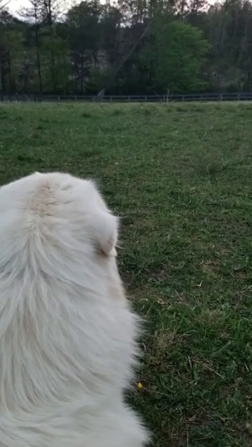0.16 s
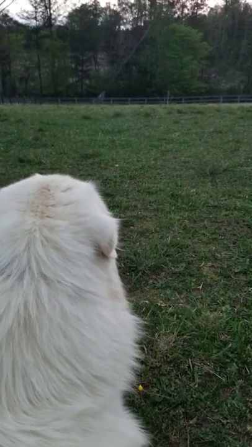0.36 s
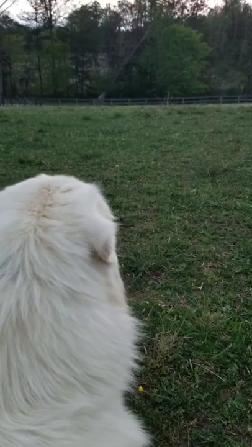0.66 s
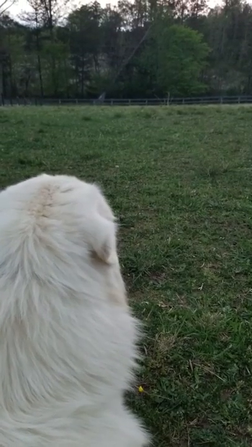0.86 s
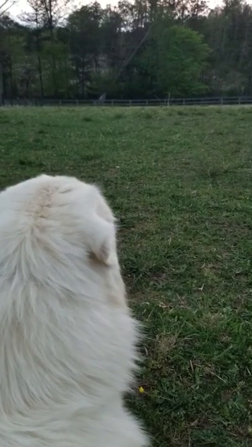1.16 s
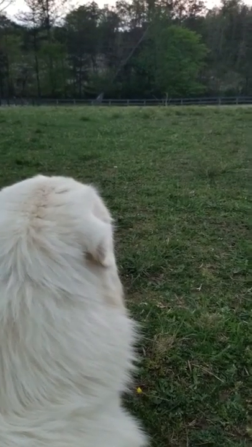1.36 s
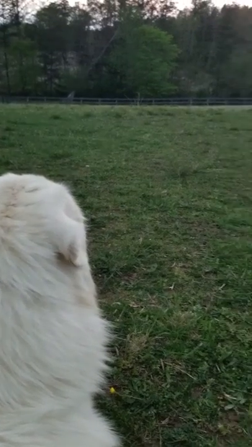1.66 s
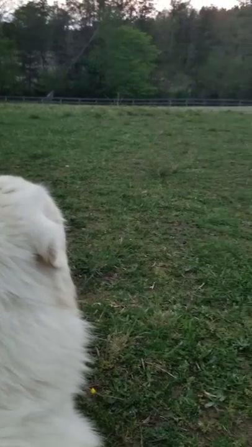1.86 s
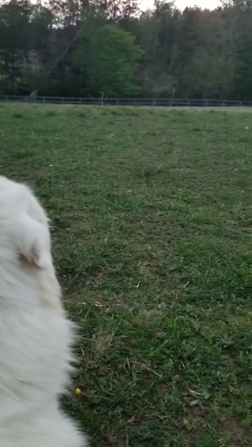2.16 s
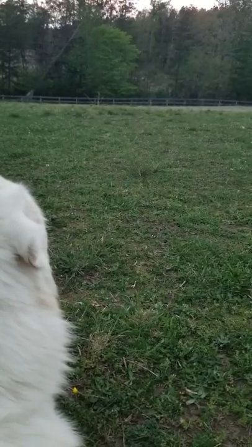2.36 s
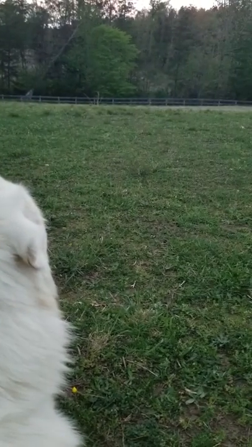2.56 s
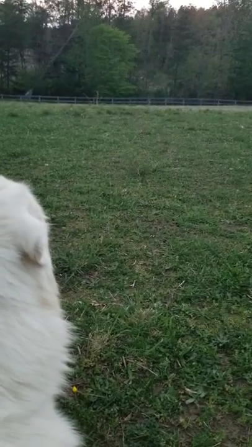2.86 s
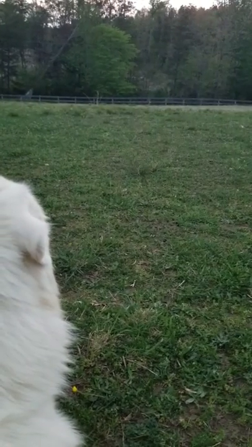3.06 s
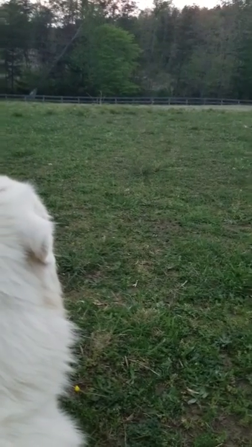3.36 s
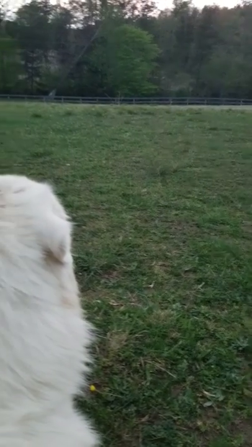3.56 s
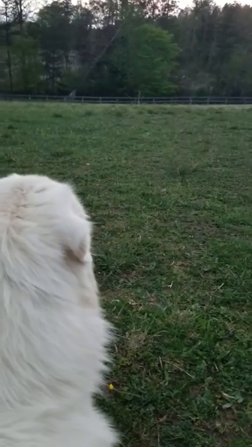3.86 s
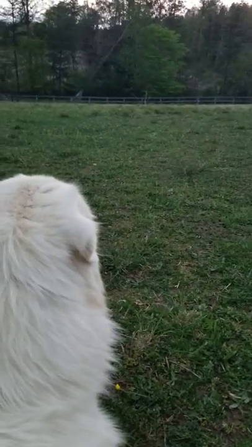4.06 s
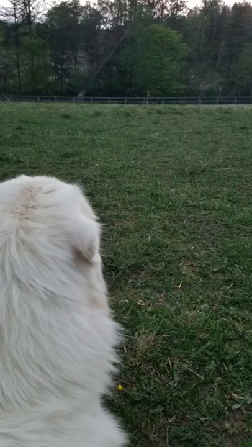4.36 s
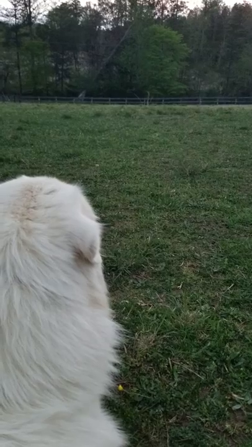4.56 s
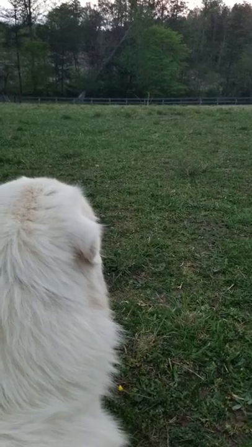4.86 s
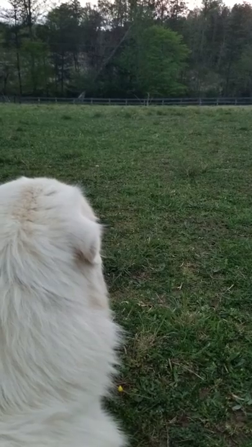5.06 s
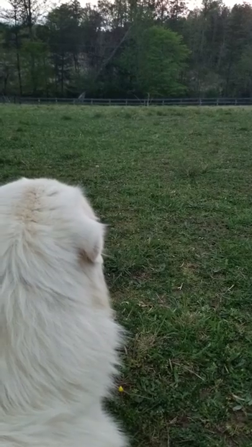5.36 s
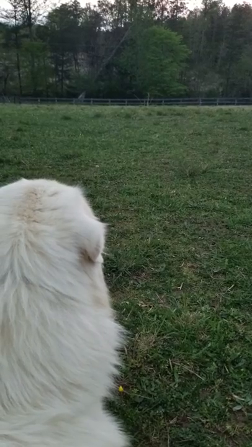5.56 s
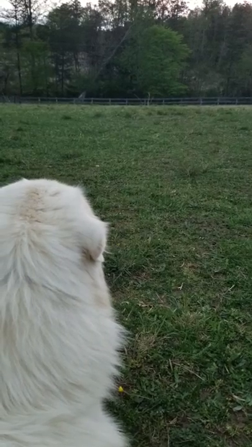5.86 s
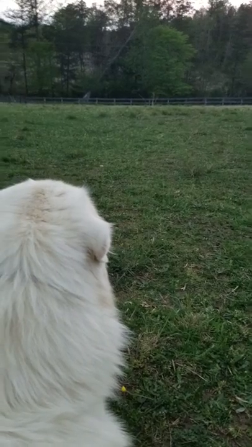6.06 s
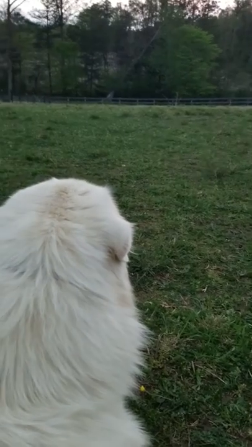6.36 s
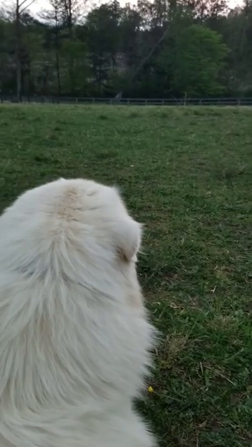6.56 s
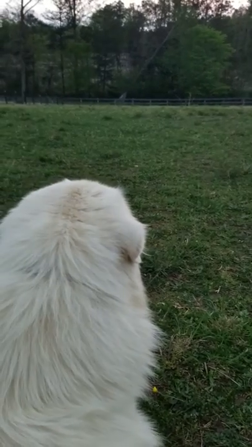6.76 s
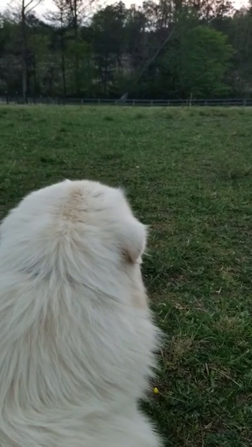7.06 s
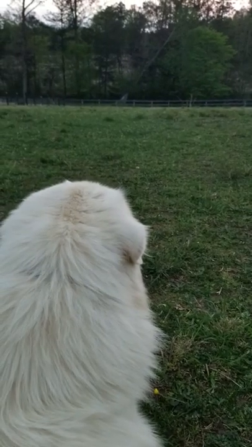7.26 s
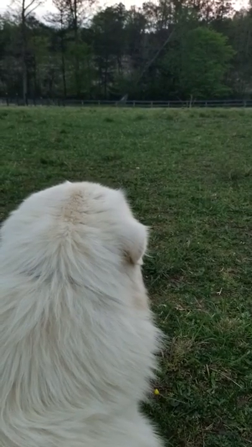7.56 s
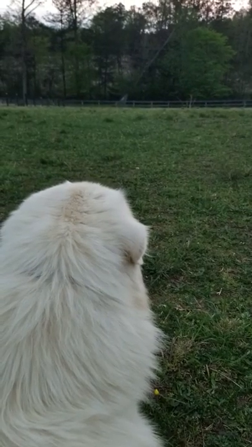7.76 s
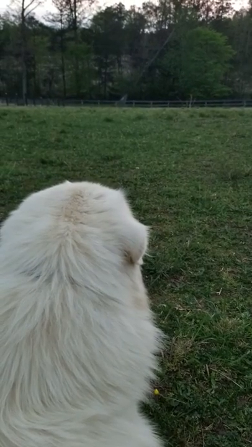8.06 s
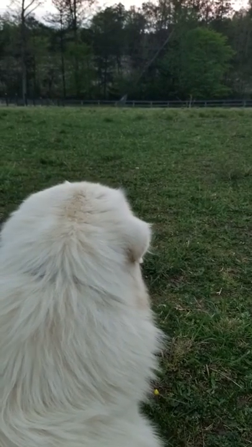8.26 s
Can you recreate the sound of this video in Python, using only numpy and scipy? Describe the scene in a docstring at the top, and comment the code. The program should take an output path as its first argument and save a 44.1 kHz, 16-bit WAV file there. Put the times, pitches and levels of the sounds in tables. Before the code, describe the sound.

Quiet pasture with distant frogs, birds and small crackles, then a big dog close by grumbles and gives three deep, hoarse-ending barks echoing faintly.

```python
"""In a pasture, a big dog beside the microphone grumbles, then gives three deep barks; a low growl joins the last two.
Its voice is made of pulses and air noise, filtered by throat, mouth and muzzle; the tree line answers faintly
as fading noise echoes. Snaps are short noise bursts. Songbirds whistle and frogs peep far off as sliding tones.
Behind them, filtered noise makes a soft distant rumble, a frog chorus and a thin insect trill."""
import sys
import numpy as np
from scipy import signal
from scipy.fft import rfft, irfft, next_fast_len
from scipy.io import wavfile
from scipy.ndimage import uniform_filter1d, map_coordinates

SR = 44100
rng = np.random.default_rng(int(sys.argv[2]) if len(sys.argv) > 2 else 0)


def log_audio(samples):
    """Write samples as a 16-bit WAV file to the path given in sys.argv[1]."""
    # one column per channel
    frames = np.atleast_2d(samples).T
    # limit to full scale, then quantise
    limited = np.clip(frames, -1, 1)
    pcm = np.round(limited * 32767).astype(np.int16)
    wavfile.write(sys.argv[1], SR, pcm)


N = 371322  # length in samples

# When the dog growls between the last two barks: start in seconds, end in seconds.
GROWL_SPAN = (6.41, 6.70)
LEAD_S = .026  # time over which barks and growl fade in and out, in seconds


def dog():
    """A closed-mouth grumble, then the barks, the last two joined by a growl."""
    # When it grumbles before barking: start in seconds, end in seconds.
    grumble_span = (5.433, 5.535)
    # The grumble: beats a second, relative peak level in dB.
    grumble_settings = (69, -34.5)
    # The barks. Each row: time of the top in seconds, seconds from start to top, top pitch in Hz, rest pitch in Hz,
    # pitch rise in seconds, pitch fall in seconds, seconds from register break to top, jaw lag in seconds,
    # roughness at the start (0-1), roughness when clearest (0-1), seconds from top to full hoarseness,
    # then the relative levels of throat, mouth, muzzle and hiss in dB.
    barks = [(5.856, .102, 431.8, 71.83, .1, .066, .11, .002, 0.47, .38, 0.026, -10.5, -26, -27.5, -54),
             (6.307, .089, 438.4, 109.8, .082, 0.065, .052, 0.042, .75, .2, 0.038, -8, -24, -29, -53),
             (6.766, .096, 440.5, 82, .076, .078, .11, 0.0019, 0.28, 0.1, 0.029, -9, -25.5, -26.5, -51.5)]
    # The growl: pitch in Hz away from its ends, roughness (0-1),
    # then the relative levels of throat, mouth, muzzle and hiss in dB.
    growl_settings = (109.5, 0.23, -39.5, -69, -58, -75.5)
    voice = grumble(*grumble_span, *grumble_settings)
    for top_s, lead_s, *row in barks:
        add(voice, top_s - lead_s, bark(lead_s, *row))
    add(voice, GROWL_SPAN[0], growl(*growl_settings))
    return voice


def bark(lead_s, top_hz, rest_hz, rise_s, fall_s, low_s, jaw_lag_s, start_rough, clear_rough, collapse_s,
         throat_db, mouth_db, muzzle_db, hiss_db):
    """One push of effort arches the pitch; the voice clears going up and turns hoarse falling; the jaw opens and shuts."""
    # How each part of the airway swells and fades: attack in seconds and release in seconds (each over 10 dB),
    # then flatness of the top (a plain number).
    throat_swell = (0.067, 0.069, 1.42)
    mouth_swell = (.068, 0.12, 4.3)
    muzzle_swell = (0.062, 0.084, 2.22)
    hiss_swell = (.056, 0.087, 1.6)
    trail_s = .172  # the voice stops this long after its top
    t = np.arange(-lead_s, trail_s, 1 / SR)
    rise_curve, fall_curve = 1.6, 1.8  # roundness of the pitch arch
    rising = np.abs(t / rise_s) ** rise_curve
    falling = np.abs(t / fall_s) ** fall_curve
    effort = np.exp(-np.where(t < 0, rising, falling))

    # until the voice breaks upward it is lower, with extra boom
    low_pitch_share, low_boom_db = .74, 6.5
    low = uniform_filter1d(1.0 * (t < -low_s), size=400)
    pitch = (rest_hz + (top_hz - rest_hz) * effort) * low_pitch_share ** low

    clear_s, hoarse_rough = .015, .98  # clearest this long before the top; roughness once hoarse
    rough = np.interp(t, [-lead_s, -clear_s, collapse_s], [start_rough, clear_rough, hoarse_rough])

    # the mouth rings as the second harmonic sweeps through
    mouth_hz, mouth_width_hz, mouth_ring_db = 701, 88, 8
    ring_db = mouth_ring_db * np.exp(-((2 * pitch - mouth_hz) / mouth_width_hz) ** 2)
    # the throat weakens at pitches where no harmonic meets its resonance
    dip_hz, dip_width_hz, throat_dip_db = 257, 61, 4.5
    dip_db = throat_dip_db * np.exp(-((pitch - dip_hz) / dip_width_hz) ** 2)

    gate = np.clip(np.minimum(t + lead_s, trail_s - t) / LEAD_S, 0, 1)
    return gate * airway(pitch, rough,
                         throat_db + swell(t, throat_swell) + low_boom_db * low - dip_db,
                         mouth_db + swell(t, mouth_swell) + ring_db,
                         muzzle_db + swell(t - jaw_lag_s / 2, muzzle_swell),
                         hiss_db + swell(t - jaw_lag_s, hiss_swell))


def swell(t, shape):
    """Level in dB that rises to 0 at t = 0 and falls away again."""
    attack_s, release_s, flatness = shape
    return -10 * np.abs(t / np.where(t < 0, attack_s, release_s)) ** flatness


def growl(hz, rough, *levels_db):
    """A low steady voice that sags out of one bark and tightens into the next: higher and stronger at both ends."""
    lift_hz, lift_db, lift_s = 28, 5, 0.038
    t = np.arange(0, GROWL_SPAN[1] - GROWL_SPAN[0], 1 / SR)
    edge_s = np.minimum(t, t[::-1])  # time to the nearer end
    lift = np.exp(-edge_s / lift_s)
    gate = np.clip(edge_s / LEAD_S, 0, 1)
    return gate * airway(hz + lift_hz * lift, rough, *[db + lift_db * lift for db in levels_db])


def grumble(start, end, rate, db):
    """Single beats of the folds thump in the chest, mouth closed."""
    # How the chest colours each beat. Each row: frequency in Hz, gain in dB.
    chest = [(30, -21), (90, 8.5), (180, -2.5), (300, -0.5), (450, -4.5), (650, -26), (1500, -48),
             (4000, -90)]
    top_s, fade_db_per_s = 0.045, 134.5  # loudest moment after the start, and the slope to either side
    beats = np.zeros(N)
    for t in np.arange(0, end - start, 1 / rate):
        beat_db = db - fade_db_per_s * abs(t - top_s) + rng.normal(0, 1.5)
        add(beats, start + t + rng.normal(0, .001), amp([beat_db + 38.5]))
    return coloured(beats, chest)


def airway(pitch, rough, throat_db, mouth_db, muzzle_db, hiss_db):
    """The folds sound through the throat, mouth and muzzle, and hiss past the teeth."""
    # Resonances of the airway, from the throat forward. Each row: frequency in Hz, relative level in dB.
    throat = [(50, -36), (110, -8), (220, -10), (330, 0.5), (430, 10.5), (490, -1), (560, -8), (700, -56),
              (1200, -102)]
    mouth = [(300, -99), (480, -2.5), (600, -0.5), (700, 2), (780, 2), (850, -10.5), (930, -19),
             (1500, -70)]
    muzzle = [(600, -59.5), (930, -11), (1050, -8.5), (1140, -5), (1290, 2.5), (1400, -3.5), (1510, -2),
              (1620, -12), (1730, -14.5), (1950, -15.5), (2200, -34.5), (3000, -48.5), (5000, -72.5)]
    hiss = [(1500, -44), (2400, 0), (3000, -8.5), (3650, -6.5), (4150, 4.5), (4550, -7), (5100, -9.5),
            (5700, -3), (6200, -16.5), (6600, -24), (7600, -11), (8300, -31.5), (15000, -35.5)]
    rough = np.clip(rough, 0, 1)
    pulses, flow, air = folds(pitch, rough)

    def resonance(source, shape, noise_share):
        """One part of the airway, rung by the folds and by air noise."""
        share = np.clip(noise_share, 0, 1)
        tone = np.sqrt(1 - share) * steady(coloured(source, shape))
        breath = np.sqrt(share) * steady(coloured(air, shape))
        return steady(tone + breath)

    voice = amp(throat_db) * resonance(flow, throat, .03 * rough ** 3)
    voice += amp(mouth_db) * resonance(pulses, mouth, .16 * rough ** 2)
    voice += amp(muzzle_db) * resonance(pulses, muzzle, .6 * rough ** 2)
    voice += amp(hiss_db + 1.0) * resonance(pulses, hiss, 0.58 + .65 * rough)
    t = np.arange(len(pitch)) / SR
    shimmer = amp(1.83 * rough * wobble(90, len(t)))  # unsteady level of a hoarse voice
    soft_ends = np.clip(np.minimum(t, t[::-1]) / 0.0043, 0, 1)
    return voice * shimmer * soft_ends


def folds(pitch, rough):
    """The source of the voice: pulses, the smooth flow under them, and air noise chopped once a cycle."""
    size = len(pitch)
    phase = 2 * np.pi * np.cumsum(pitch * (1 + 0.0365 * rough * wobble(330, size))) / SR
    k = np.arange(1, 31)[:, None]  # harmonic numbers
    pulses = unit(np.sum(np.cos(k * phase) / k ** 0.85, axis=0))
    pulses *= 1 + .36 * rough * wobble(260, size)
    # under strain a second, higher oscillator joins in: lines appear at its pitch minus and plus the harmonics
    second_hz, full_strain_hz = 1070, 440
    second = 2 * np.pi * np.cumsum(second_hz * (1 + 0.023 * rough * wobble(150, size))) / SR
    strain = (pitch / full_strain_hz) ** .55 * (0.066 + 1.3 * rough)
    pulses += strain * (np.cos(second) * (pulses + .5) + 0.27 * rough * np.cos(second - phase))
    # gently closing folds favour the fundamental
    flow = pulses + 2.6 * (1 - rough) ** 3 * np.cos(phase)
    # pressed, hoarse folds weaken it
    flow = flow - 0.33 * rough * np.cos(phase)
    air = unit(rng.standard_normal(size) * np.exp(1.4 * np.cos(phase)))
    return pulses, flow, air


def pasture(voice):
    """Quick reflections from the ground, scatter from the field, later answers from the tree line and woods behind."""
    # How fast the field's scatter dies. Each row: frequency in Hz, seconds to fade by 60 dB.
    field = [(100, .6), (400, 1.8), (1300, 2.88), (3000, 0.57), (8000, 0.46)]
    # How distance colours the echoes. Each row: frequency in Hz, gain in dB.
    field_colour = [(100, -14.5), (250, -7.5), (420, -4.5), (750, -1), (1300, 2), (1600, 2), (2500, 7),
                    (8000, -29)]
    far = coloured(voice, field_colour)
    near = coloured(voice, [(150, -32.0), (400, -27.5), (800, 3), (1500, 4.5), (4000, 12.5)])
    answer = amp(-9) * reverb(near, [(400, .05), (4000, .05)], rise_s=.002)
    answer += amp(-29.5) * reverb(far, field, rise_s=0.021)
    tree_line = reverb(far, [(200, 0.33), (2000, 0.39)], rise_s=.02)
    add(answer, .29, amp(-29.5) * tree_line)
    woods_behind = reverb(far, [(400, 4.9), (2000, 2.05)], rise_s=0.23)
    add(answer, .9, amp(-42.0) * woods_behind)
    return answer


def snaps():
    """Each snap is a noise burst: a brief crack, in most of them, with a short scattered tail."""
    # Dry snaps. Each row: start in seconds, relative level in dB, relative strength of the first crack (0-1).
    snap_rows = [(.009, -46.5, 0.4), (0.234, -51.5, 0.5), (0.906, -56.5, 0), (1.351, -53, 0.6),
                 (1.801, -45.5, 0.1), (3.06, -45.5, 1), (3.178, -48.5, 0), (3.561, -51, 0.3),
                 (3.573, -47, 0.84), (3.649, -63.5, 0.5), (4.51, -50, 0.8), (5.212, -45.5, 0.6),
                 (6.027, -46, 0.8)]
    # The colour of the snaps. Each row: frequency in Hz, gain in dB.
    snap_colour = [(200, -17), (390, 4.5), (520, -14.5), (900, -8.5), (1400, -13.5), (1850, -2.5),
                   (2050, -3.5), (2750, 0), (3100, -8.5), (3900, -2), (5100, -14), (7500, -20),
                   (8600, -45.5), (15000, -46.5)]
    track = np.zeros((2, N))
    t = np.arange(SR // 3) / SR
    for s, db, share in snap_rows:
        crack = 3.4 * share * amp(-60 * t / .012) * rng.standard_normal(len(t))
        tail_fade = amp(-60 * t / 0.18) + amp(-14 - 60 * t / .45)
        scatter = tail_fade * rng.standard_normal((2, len(t)))
        add(track, s, amp(db + 12.5) * (placed(crack, -0.097, [(1000, 5.1)]) + scatter))
    return placed(coloured(track, snap_colour), 0, [(1000, 1.4), (2500, 8.1), (4500, 1.5)])


def birds_and_frogs():
    """Chirps sound close by; a repeated song, slurred whistles and frog peeps sound farther off; all ring in the woods."""
    # Runs of arched chirps from a near bird. Each row: start in seconds, end in seconds, seconds between chirps,
    # chirp length in seconds, top pitch in Hz, dip at the top in dB (negative: a rise), relative level in dB,
    # fade in dB per chirp (negative: growing).
    twitters = [(0.049, .3, .107, .056, 2800, 9.5, -42, 2.5),
                (1.598, 1.76, 0.11, 0.046, 2580, 0.5, -52.5, -2),
                (2.671, 3.01, .095, .049, 2735, -3.5, -55.5, 4.5)]
    # Its sharp call notes. Each row: start in seconds, length in seconds, top pitch in Hz, relative level in dB.
    chips = [(.368, .033, 2700, -50), (1.314, .009, 2440, -46), (1.769, .0053, 2550, -35)]
    # A songbird's phrase: lead-in, high slur, drop and held note. Each row: seconds after the song's start,
    # length in seconds, start pitch in Hz and end pitch in Hz before the song's pitch factor, relative level in dB.
    phrase = [(0, .05, 2600, 2716, -7.5), (0.046, .04, 3600, 3204, 0.5), (.079, .037, 3030, 2272, 1.5),
              (.124, .115, 2638, 2336, -2)]
    # Each time it is sung. Each row: start in seconds, pitch factor (a plain number), relative level in dB.
    songs = [(4.944, 1, -53), (5.452, 0.99, -48.5), (7.505, 1.0, -53)]
    # Single slurred whistles. Each row: start in seconds, length in seconds, start pitch in Hz,
    # end pitch in Hz, relative level in dB.
    whistles = [(.66, 0.053, 2060, 1930, -68.5), (2.579, 0.06, 2490, 2210, -62.5),
                (5.947, .064, 3350, 2780, -50), (6.049, .068, 3790, 3480, -49),
                (6.137, .066, 2160, 2570, -52.5), (6.2, 0.039, 2524, 2230, -49.5),
                (8.032, 0.14, 3168, 3220, -49), (8.114, .19, 2850, 2673, -53),
                (8.188, .034, 2770, 2490, -55)]
    # Bouts of rising peeps from the nearest frogs. Each row: start in seconds, end in seconds,
    # seconds between peeps, start pitch in Hz, relative level in dB.
    frogs = [(.63, 3.3, .78, 2835, -65.5), (1.15, 4.1, .84, 3290, -66), (4.86, 8.3, .773, 2810, -61.5)]
    near, far = np.zeros(N), np.zeros(N)
    for start, end, gap, length, top_hz, dip_db, db, fade_db in twitters:
        for k, s in enumerate(np.arange(start, end, gap)):
            add(near, s, chirp(length, top_hz, db - k * fade_db, dip_db))
    for s, *row in chips:
        add(near, s, chirp(*row))
    for s, key, song_db in songs:
        for after, length, start_hz, end_hz, db in phrase:
            add(far, s + after, whistle(length, key * start_hz, key * end_hz, song_db + db))
    for s, *row in whistles:
        add(far, s, whistle(*row))
    for start, end, gap, start_hz, db in frogs:
        peep_hz = start_hz * np.linspace(1, 1.075, int(.11 * SR))
        for s in np.arange(start, end, gap):
            add(far, s, note(peep_hz, db, flutter_db=-2.0, waver=.003))
    woods = reverb(amp(-7.5) * far + amp(-16) * near, [(2000, 0.7), (4000, 0.39)], rise_s=0.015)
    return placed(near, -0.11, [(2500, 9.0)]) + placed(far, -0.12, [(3000, 3.5)]) + woods


def chirp(length, top_hz, db, dip_db=0):
    """A scratchy note that arches up and down and may thin out or strengthen at the top."""
    u = np.linspace(-1, 1, int(length * SR))
    hz = top_hz * (1 - 0.3 * np.abs(u) ** 1.6)
    return amp(-dip_db * (1 - u * u)) * note(hz, db - 4.5, flutter_db=3.5, waver=0.035)


def whistle(length, start_hz, end_hz, db):
    """A nearly pure note that slides and settles on its last pitch."""
    u = np.linspace(1, 0, int(length * SR))
    return note(end_hz + (start_hz - end_hz) * u * u, db - 1, flutter_db=3, waver=.007)


def note(hz, db, flutter_db, waver):
    """A sine tone that swells and fades along a pitch path, fluttering in level and pitch."""
    size = len(hz)
    envelope = np.sqrt(2 * np.abs(np.sin(np.linspace(0, np.pi, size))))
    phase = 2 * np.pi * np.cumsum(hz * (1 + waver * wobble(500, size))) / SR
    flutter = unit(amp(flutter_db * wobble(200, size)))
    return amp(db) * flutter * envelope * np.sin(phase)


def background():
    """Distant rumble, a chorus of frogs and a thin insect trill, each made of filtered noise."""
    # The far rumble, the frog chorus and the insects. Each row: frequency in Hz, relative level in dB.
    rumble_spectrum = [(20, -23.5), (40, -15), (65, -5.5), (130, -1), (180, -6.5), (240, -7.5),
                       (400, -17.5), (600, -22.5), (820, -16.5), (1100, -18), (1400, -28.5), (1900, -42),
                       (8000, -50.5), (14000, -44)]
    chorus_spectrum = [(2000, -42.5), (2650, -26), (2900, -9), (3080, -3), (3350, -11), (3750, -23),
                       (6000, -32)]
    insect_spectrum = [(3500, -28), (4100, -6.5), (4450, 2.5), (4750, -2.5), (5200, -18), (6500, -48)]
    # How alike the rumble is at left and right. Each row: frequency in Hz, likeness (-1 to 1).
    rumble_alike = [(60, 0.94), (150, 1), (380, 0.85), (950, 0.59), (2380, 0.0072), (5980, -0.25),
                    (15000, -0.2)]
    rumble = amp(-51.5 + 0.19 * wobble(1.4, N)) * rush(rumble_spectrum, rumble_alike, patchy_db=1.37)
    frogs = amp(-69.0 + 0.53 * wobble(3.6, N)) * rush(chorus_spectrum, [(3000, 0.071)], patchy_db=3.5)
    # the insects pulse about 36 times a second
    trill = 1 + 0.16 * np.sin(2 * np.pi * np.cumsum(36 + wobble(3.5, N)) / SR)
    insects = amp(-73) * trill * rush(insect_spectrum, [(4500, 0.052)], patchy_db=0.5)
    return (rumble + frogs + insects) * amp([[.6], [-.6]])  # slightly louder at left


def rush(spectrum, alike, patchy_db):
    """Stereo noise of rms 1 with patches of random gain."""
    z = signal.stft(rng.standard_normal((2, N)), nperseg=1024)[2]
    patches = uniform_filter1d(rng.standard_normal(z.shape[1:]), size=5, axis=0)
    patches = uniform_filter1d(patches, size=10, axis=1)
    pair = signal.istft(z * amp(patchy_db * unit(patches)), nperseg=1024)[1][:, :N]

    def response(hz):
        """Colour the noise and share it between middle and sides to set the left-right likeness."""
        turn = np.arccos(np.clip(along(alike, hz), -1, 1)) / 2
        return amp(along(spectrum, hz)) * [np.cos(turn), np.sin(turn)]

    mid, side = filtered(pair, response)
    return unit(np.array([mid + side, mid - side]))


def reverb(x, t60s, rise_s):
    """A diffuse stereo tail that builds up, then dies at each frequency's own speed: (Hz, seconds to fade 60 dB)."""
    hz, t, z = signal.stft(rng.standard_normal((2, 2 * SR)), SR, nperseg=256)
    decay = amp(-60 * t / along(t60s, hz)[:, None])
    build_up = 1 - np.exp(-t / rise_s)
    tail = signal.istft(z * decay * build_up, SR, nperseg=256)[1]
    return signal.fftconvolve(x[None], tail / np.linalg.norm(tail[0]), axes=1)[:, :N]


def placed(x, lead_ms, balance):
    """A source at two microphones: the left leads in time and differs in level by (Hz, dB)."""
    side = np.array([[.5], [-.5]])  # half the difference to each ear

    def response(hz):
        return amp(side * along(balance, hz)) * np.exp(2j * np.pi * hz * side * lead_ms / 1000)

    return filtered(x, response)


def coloured(x, points):
    """x through a causal filter with the gain of (Hz, dB) points."""
    def response(hz):
        # folding the cepstrum makes the filter sound only after its input
        cepstrum = irfft(np.log(amp(along(points, hz))))
        half = len(cepstrum) // 2
        cepstrum[1:half] *= 2
        cepstrum[half + 1:] = 0
        return np.exp(rfft(cepstrum))
    return filtered(x, response)


def filtered(x, response):
    """x times a complex response of frequency."""
    size = x.shape[-1]
    m = next_fast_len(size + SR // 10)
    return irfft(rfft(x, m) * response(np.fft.rfftfreq(m, 1 / SR)), m)[..., :size]


def steady(x):
    """x held near rms 1 from moment to moment."""
    power = uniform_filter1d(uniform_filter1d(x * x, size=600), size=600)
    return x / np.sqrt(np.abs(power) + 1e-12)


def add(track, s, sound):
    """Mix a sound into a track at time s in seconds."""
    part = track[..., max(round(s * SR), 0):][..., :sound.shape[-1]]
    part += sound[..., :part.shape[-1]]


def wobble(rate, size):
    """A smooth random curve, rate knots a second."""
    knots = rng.standard_normal(size // 20)
    return map_coordinates(knots, [np.arange(size) * rate / SR], mode="wrap")


def along(points, hz):
    """(Hz, value) points read on a log axis."""
    f, v = np.transpose(points)
    return np.interp(np.log(hz + 1), np.log(f + 1), v)


def unit(x):
    """Scale to rms 1."""
    return x / np.sqrt(np.mean(x ** 2) + 1e-20)


def amp(db):
    """Decibels to gain."""
    return 10 ** (np.asarray(db) / 20)


def scene():
    """The dog, its echo and the life around the field."""
    # Level of the dog at left over right. Each row: frequency in Hz, difference in dB.
    dog_balance = [(100, 1), (380, -1), (700, 4.5), (1300, 5.5), (2400, 5.5), (4400, 0), (8000, 11.5)]
    voice = dog()
    return placed(voice, 0.15, dog_balance) + pasture(voice) + snaps() + birds_and_frogs() + background()


def record(dry):
    """The recorder keeps nothing above its band limit."""
    top_hz = 15750
    return filtered(dry, lambda hz: hz < top_hz)


dry = scene()
out = record(dry)
log_audio(out)
```